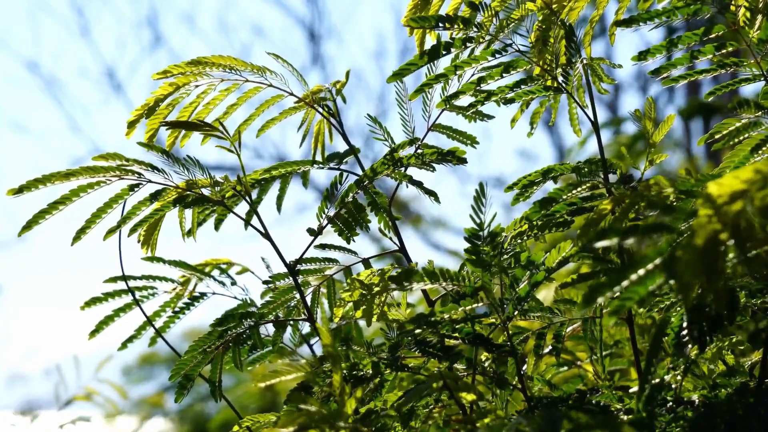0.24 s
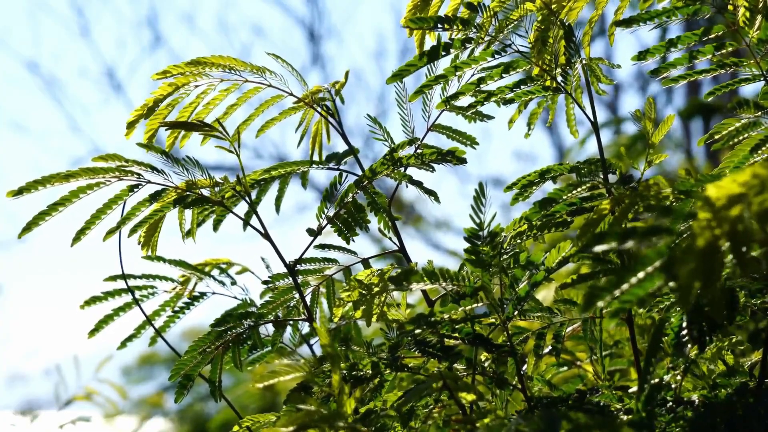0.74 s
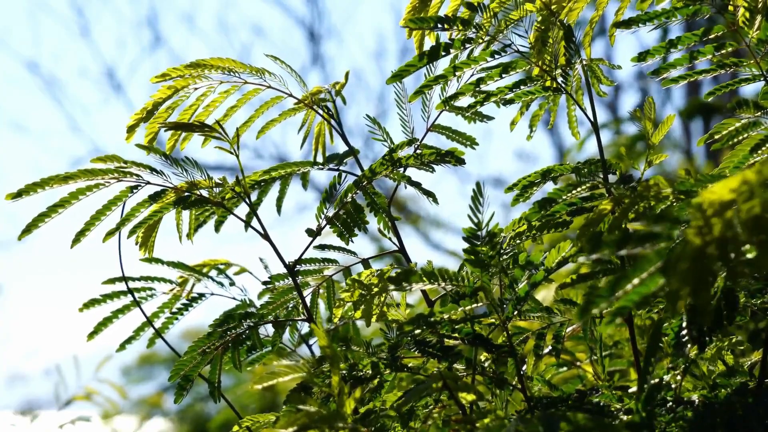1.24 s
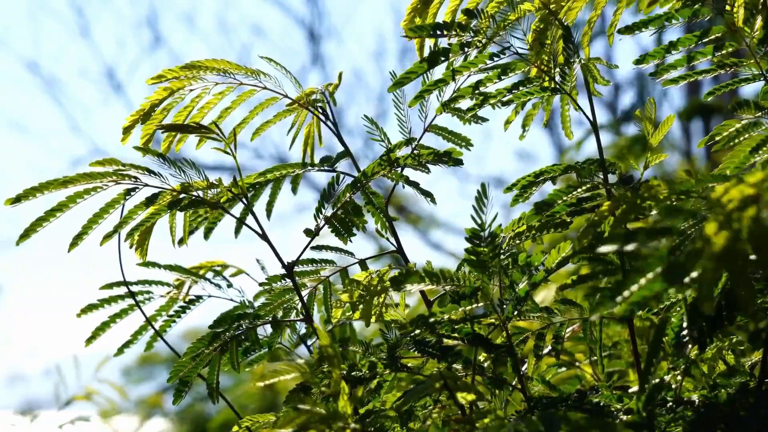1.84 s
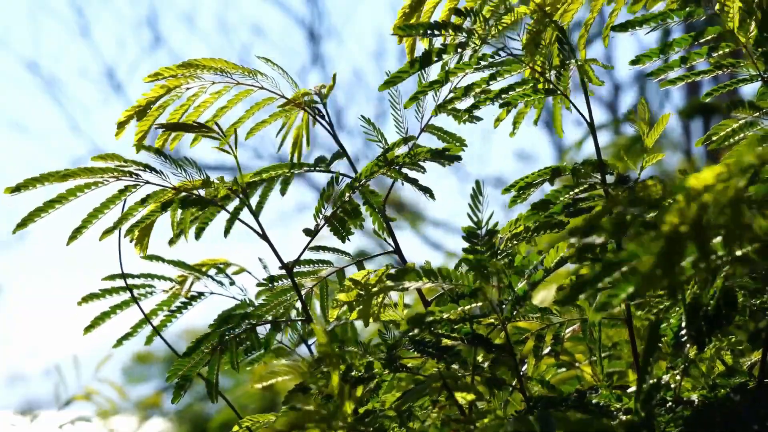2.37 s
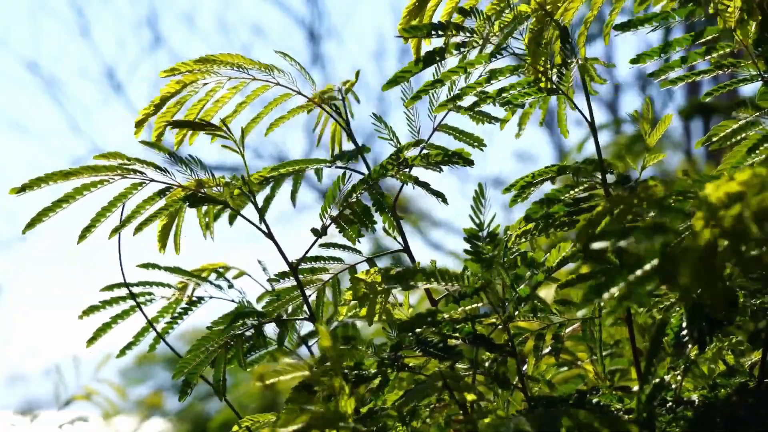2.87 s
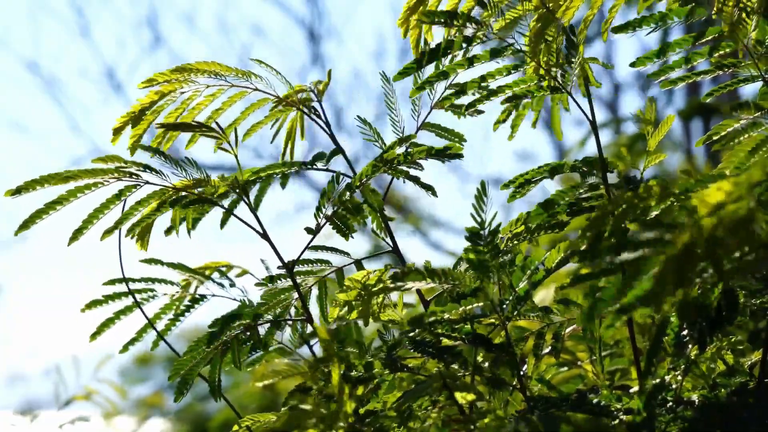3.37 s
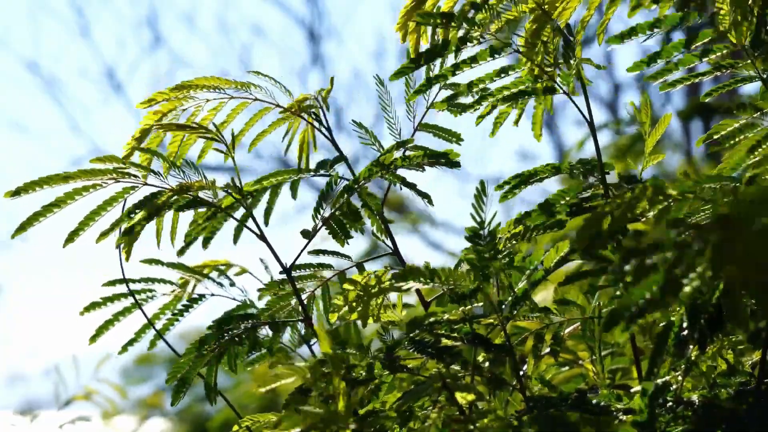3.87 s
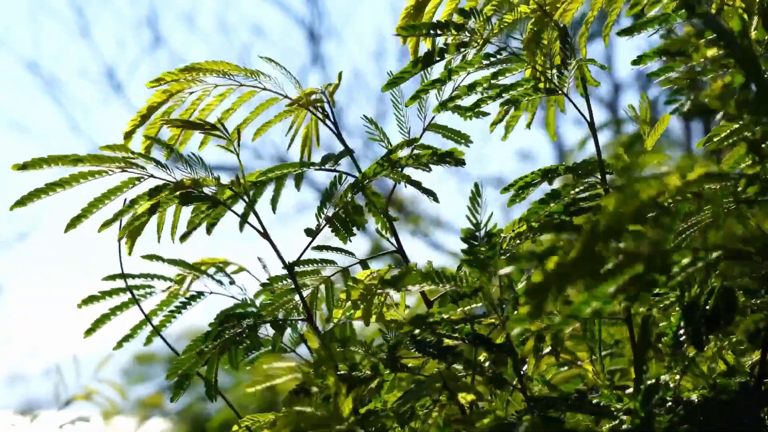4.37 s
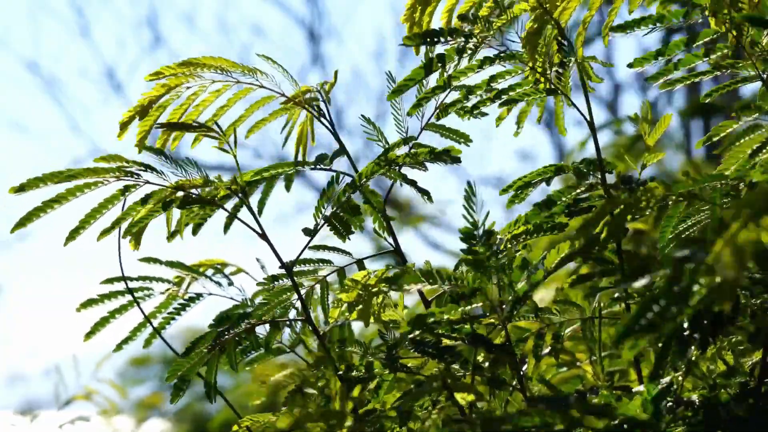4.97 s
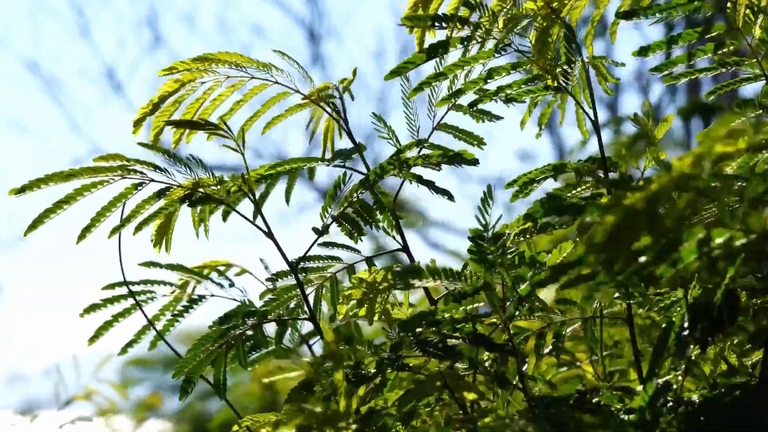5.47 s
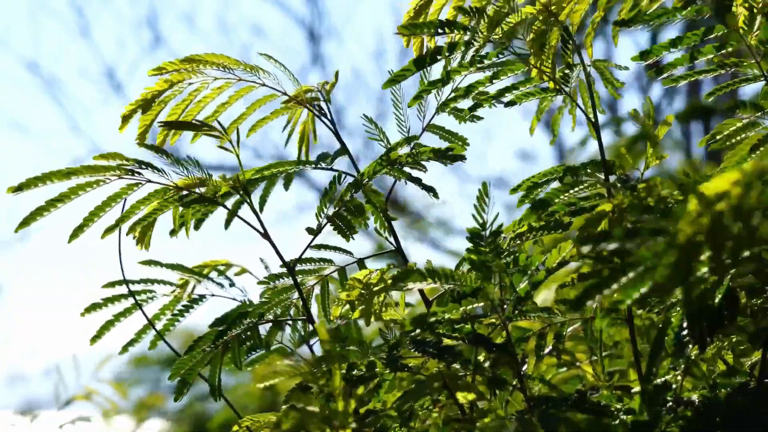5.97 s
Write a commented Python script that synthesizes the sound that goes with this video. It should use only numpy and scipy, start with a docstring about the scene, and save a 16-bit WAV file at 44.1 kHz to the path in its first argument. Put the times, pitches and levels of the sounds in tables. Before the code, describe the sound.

A brief, thin bird twitter opens over a light rustle of leaves and a faint hum that soon dies away. A high, pulsing insect rasp sets in and continues as the wind eases, then grows into a gust. Leaves sizzle, stems click close by, and low buffeting hits the microphone over the wash of far trees in the open air. Toward the end, a distant bird sounds short ringing notes.

```python
"""A feathery-leaved tree hisses and ticks in a building gust, as countless small impacts of its leaflets
add up to noise. Far trees wash behind it and eddies buffet the microphone. An insect rasps about six times
a second by driving a resonant membrane with clicks. A small bird twitters at first, a faint low drone
fades away, and a far bird gives bell-like notes, mostly near the end."""
import sys
import numpy as np
from scipy import signal
from scipy.io import wavfile
from scipy.ndimage import uniform_filter1d

SR = 44100
rng = np.random.default_rng(int(sys.argv[2]) if len(sys.argv) > 2 else 0)


def put_to_file(sound):
    """Save the sound as 16-bit audio at rate SR, in the file named by the first command-line argument."""
    columns = np.atleast_2d(sound).T  # one column per channel
    safe = np.clip(columns, -1, 1)
    whole_steps = np.round(safe * 32767)
    wavfile.write(sys.argv[1], SR, whole_steps.astype(np.int16))


N = 273861
TIME = np.arange(N) / SR


def from_db(db):
    """Amplitude ratio of a level in decibels."""
    return 10 ** (np.asarray(db) / 20)


def rms_one(x):
    """Normalisation to unit power."""
    return x / np.sqrt(np.mean(x ** 2) + 1e-20)


def in_time(rows):
    """Linear interpolation of each level column at every sample."""
    times, *columns = np.transpose(rows)
    return [np.interp(TIME, times, column) for column in columns]


def at_hz(points, hz):
    """Interpolation of a spectrum on a log-frequency axis."""
    frequencies, levels = np.transpose(points)
    return np.interp(np.log(hz), np.log(frequencies), levels)


def drift(rate_hz):
    """Slow random modulation: low-pass noise of unit power."""
    step, settle = 40, 2000
    r = np.exp(-2 * np.pi * step * rate_hz / SR)
    slow = signal.lfilter([1], [1, -2 * r, r * r], rng.standard_normal(N // step + settle + 2))[settle:]
    return np.interp(np.arange(N) / step, np.arange(len(slow)), rms_one(slow))


def band(x, low_hz, high_hz):
    """Butterworth band-pass filtering."""
    sections = signal.butter(2, [low_hz, min(high_hz, .45 * SR)], "band", fs=SR, output="sos")
    return signal.sosfilt(sections, x + 1e-18)


def resonate(x, hz, width_hz):
    """A damped resonator with unit gain at its peak."""
    r = np.exp(-np.pi * width_hz / SR)
    feedback = [1, -2 * r * np.cos(2 * np.pi * hz / SR), r * r]
    return signal.lfilter(np.array([1, 0, -1]) * (1 - r * r) / 2, feedback, x + 1e-18)


def spread(mid, side, side_db):
    """Mid-side stereo: a difference between the channels gives width."""
    return mid + from_db(side_db) * side * np.array([[1], [-1]])


def coloured(draws, spectrum, flutter_db, flutter_hz):
    """Spectral shaping in third octaves that flutter independently; neighbours take unrelated noise."""
    out, edges = 0, 31.25 * 2 ** (np.arange(28) / 3)
    for k, (low, high) in enumerate(zip(edges, edges[1:])):
        gain = from_db(at_hz(spectrum, np.sqrt(low * high)) + flutter_db * drift(flutter_hz))
        if high > spectrum[0][0]:
            out = out + gain * band(draws[k % 2], low, high)
    return rms_one(out)


def contacts(per_s, size_db, blur, channels):
    """Shot noise of leaf touches over a Gaussian blur of countless smaller ones; two unrelated draws."""
    shape = (2, channels, N)
    sizes = from_db(size_db * np.minimum(rng.exponential(1, shape), 4.5)) * rng.choice([-1, 1], shape)
    touches = sizes * (rng.random(shape) < per_s / SR)
    return rms_one(touches) + blur * rng.standard_normal(shape)


def crisp_ticks(per_s, width_hz=700):
    """Impulse excitation: each sparse dry touch briefly rings one resonance."""
    sizes = from_db(1.1 * np.minimum(rng.exponential(1, N), 3)) * (rng.random(N) < per_s / SR)
    pitches = np.geomspace(6500, 14200, num=24)
    dealt = rng.integers(len(pitches), size=N)
    return rms_one(sum(resonate(sizes * (dealt == k), hz, width_hz) * hz for k, hz in enumerate(pitches)))


def foliage():
    """Friction and impact: fronds sweep and leaflets patter, with more touches in a stronger gust."""
    # the gust in the near tree: (time [s], sweep level [dB], sizzle level [dB])
    gust = [(0, -52.5, -50), (.95, -60.5, -53), (1.85, -59.5, -56.5), (2.42, -57.5, -54.5),
            (2.6, -55.5, -52), (3.1, -54.5, -50), (3.3, -53, -47.5), (4.35, -54.5, -49.5),
            (4.7, -53, -48.5), (5.4, -52, -49), (6.15, -50, -48)]
    # spectrum of sweeping fronds: (frequency [Hz], relative density [dB])
    sweep_spectrum = [(1200, -5.5), (1900, 6), (3200, -3), (4400, 1), (6000, 5), (7800, 4), (9500, -7.5),
                      (14000, -49)]
    # spectrum of sizzling leaflets: (frequency [Hz], relative density [dB])
    sizzle_spectrum = [(5000, -17), (8000, -4), (9500, 7.5), (11300, 8.5), (13000, 9.5), (15000, -3)]
    sweep_db, sizzle_db = in_time(gust)
    per_s = 2400 * from_db(sizzle_db - sizzle_db.max())
    sway = drift(16.7)   # touches come in clumps as a branch swings
    rubs = contacts(per_s, size_db=4.5, blur=0.91, channels=2)
    sweep = coloured(rubs, sweep_spectrum, flutter_db=2.2, flutter_hz=41)
    taps = contacts(per_s, size_db=3.5, blur=1.0, channels=1)
    sizzle = coloured(taps, sizzle_spectrum, flutter_db=1.35, flutter_hz=65)
    sizzle = sizzle + from_db(-9) * crisp_ticks(per_s / 20)
    fronds = spread(*sweep, side_db=-8.5) * from_db(sweep_db - 0.1 + 1.8 * sway)
    return fronds + sizzle * from_db(sizzle_db - 0.9 + 1.24 * sway)


def far_trees(swell_db=4.5, peak_s=4.13, swell_s=4.06):
    """Incoherent summation: distant crowns merge into a wash that swells once over the steady open air."""
    # spectrum of wind in far crowns: (frequency [Hz], relative density [dB])
    wash_spectrum = [(70, 3), (130, 0.5), (250, 1), (500, -3), (1000, -6.5), (1500, -10), (2200, -14.5),
                     (3100, -38), (4500, -18), (7000, -17.5), (15000, -24.5)]
    # spectrum of the open air: (frequency [Hz], relative density [dB])
    air_spectrum = [(30, 2.5), (55, -3.5), (90, -10.5), (150, -15), (300, -17.5), (800, -19.5),
                    (2500, -33.5), (8000, -59)]
    wash_db = -51.5 + swell_db * np.exp(-((TIME - peak_s) / swell_s) ** 2)
    wash = coloured(rng.standard_normal((2, N)), wash_spectrum, flutter_db=1.0, flutter_hz=4.0)
    air = coloured(rng.standard_normal((2, N)), air_spectrum, flutter_db=1.5, flutter_hz=3.9)
    return from_db(wash_db) * wash + from_db(-48.5) * air


def buffeting(eddy_hz=9, width_hz=7, screen_hz=50):
    """Turbulent pressure: slow eddies push on the microphone; its windscreen smooths the faster ones."""
    # wind at the microphone: (time [s], relative level [dB])
    wind = [(.1, -34), (.45, -40.5), (1, -48), (2.1, -36.5), (2.35, -30.5), (3.1, -29), (3.55, -22),
            (3.9, -22), (4.55, -23), (4.9, -30.5), (5.3, -20.5), (5.75, -30), (6.05, -21.5)]
    level_db, = in_time(wind)
    r = np.exp(-np.pi * width_hz / SR)
    feedback = [1, -2 * r * np.cos(2 * np.pi * eddy_hz / SR), r * r]
    eddies = signal.lfilter([1], feedback, rng.standard_normal(N + SR))
    push = signal.sosfilt(signal.butter(1, [4, screen_hz], "band", fs=SR, output="sos"), eddies)[SR:]
    pressure = uniform_filter1d(from_db(level_db + 3.5), size=11025)   # the moving air has inertia
    return pressure * push / np.sqrt(uniform_filter1d(push ** 2, size=22050))


def drone(hz=213, width_hz=20, level_db=-54, hold_s=1.05, fade_s=0.97):
    """Narrow-band noise: a wavering hum, perhaps a far motor, holds and then fades."""
    fade = np.clip(1 - (TIME - hold_s) / fade_s, 0, 1)
    phase = 2 * np.pi * hz * TIME
    return from_db(level_db) * fade * (drift(width_hz) * np.sin(phase) + drift(width_hz) * np.cos(phase))


def small_bird(edge_s=0.0057):
    """Frequency modulation: each thin whistle is one straight, slightly unsteady glide."""
    # slurred notes: (onset [s], length [s], start pitch [Hz], end pitch [Hz], level [dB])
    notes = [(.022, .057, 6080, 4870, -52), (.08, .035, 4980, 5320, -50), (.147, 0.012, 6650, 6300, -49),
             (.171, .028, 6250, 5750, -59.5), (.21, 0.0204, 6650, 6050, -55.5),
             (.234, .015, 6900, 6340, -56), (0.26, .02, 7000, 6100, -56), (.361, .05, 6950, 5480, -55),
             (0.468, 0.072, 6280, 5040, -54.5)]
    whistles = np.zeros(N)
    waver = 1 + 0.0045 * drift(160)
    for onset, length, start_hz, end_hz, db in notes:
        hz = np.interp(TIME, [onset, onset + length], [start_hz, end_hz])
        gate = np.clip(.5 + np.minimum(TIME - onset, onset + length - TIME) / edge_s, 0, 1)
        whistles += gate * from_db(db) * np.sqrt(2) * np.sin(2 * np.pi * np.cumsum(hz * waver) / SR)
    return whistles + from_db(-7.0) * reverberation(whistles, t60=0.28)


def reverberation(x, t60):
    """Diffuse scattering off trunks and ground: decaying echo trains, different on each side."""
    echoes = np.zeros((2, N))
    for k, lag in enumerate((rng.uniform(0.0066, .05, size=16) * SR).astype(int)):
        loop, gain = x.copy(), from_db(-60 * lag / SR / t60)
        for i in range(lag, N, lag):
            loop[i:i + lag] += gain * loop[i - lag:i][:N - i]
        echoes[k % 2] += (loop - x) * (-1) ** (k // 2)
    return rms_one(echoes) * np.std(x)


def tick(time_s, peak_db, hz, breadth, decay_s, grit=0.53, brush=0.1, approach_s=.0012):
    """A contact transient: dry parts graze, crack broadly about one pitch, then brush as they part."""
    lead = SR // 100
    age = np.arange(-lead, SR // 20) / SR
    after = np.maximum(age, 0)
    graze = np.exp(np.minimum(age, 0) / approach_s)
    scrape = grit * np.exp(-after / decay_s) + brush * np.exp(-after / 0.0095)
    force = (age == 0) + rng.standard_normal(len(age)) * graze * scrape
    crack = band(force, hz / (1 + breadth), hz * (1 + breadth))
    return np.pad(from_db(peak_db) * crack / np.abs(crack).max(), (round(time_s * SR) - lead, N))[:N]


def near_twigs():
    """Discrete impacts: the closest leaflets and stems are loud enough to be heard one by one."""
    # leaflets flicking each other: (time [s], relative peak level [dB], pitch [Hz])
    flicks = [(0.5452, -35, 12400), (1.2067, -39, 11300), (1.3279, -37, 11500), (2.5636, -29.5, 10400),
              (3.2281, -36, 13800), (3.508, -37, 12100), (3.885, -32, 12100), (4.0347, -32, 12700),
              (4.6598, -38, 10700), (5.023, -31, 11600), (5.7329, -33, 11400), (5.852, -31, 11600),
              (5.9579, -31, 11900), (6.107, -29, 11900), (6.167, -30, 10700)]
    # stems knocking: (time [s], peak level [dB], pitch [Hz])
    knocks = [(.147, -32, 7400), (.472, -32, 7600), (3.454, -27.5, 9000), (3.883, -28.5, 7060),
              (4.737, -31, 3500), (4.931, -29.5, 4400), (5.087, -32.5, 3200), (5.195, -33, 3470),
              (5.736, -34, 4000), (5.985, -35, 1950)]
    leaflets = sum(tick(s, db + 1.5, hz, breadth=0.17, decay_s=0.00097) for s, db, hz in flicks)
    return leaflets + sum(tick(s, db, hz, breadth=0.88, decay_s=.001) for s, db, hz in knocks)


def chirping(first_s=.604, settled_period_s=.1661, warm_up_s=1.2, edge_s=0.031, floor_db=-15):
    """Amplitude modulation: the insect's chirps grow faster, shorter and louder as it warms up."""
    k = np.arange(N / SR / settled_period_s)
    centres = first_s + settled_period_s * k + .149 * (1 - np.exp(-k / 5))
    cold = np.exp(-np.maximum(TIME - first_s, 0) / warm_up_s)
    length_s = 0.1 + 0.025 * cold
    gate = 0
    for centre in centres:
        chirp = np.clip(.5 + (length_s / 2 - np.abs(TIME - centre)) / edge_s, 0, 1)
        gate = gate + from_db(0.3 * rng.standard_normal()) * chirp
    return from_db(-50 - 13 * cold) * (gate + from_db(floor_db))


def insect(click_hz=236, rasp=0.062):
    """Forced resonance: a fast train of clicks rings a membrane, and the foliage blurs the sound."""
    # modes of the membrane: (frequency [Hz], bandwidth [Hz], relative gain [dB])
    modes = [(4675, 120, -2.5), (4966, 200, 2.5), (5250, 200, -6.5), (5380, 57, -18)]
    turns = np.cumsum(click_hz * (1 + .022 * drift(40))) / SR
    clicks = np.diff(np.floor(turns), prepend=0) * from_db(0.57 * drift(120))
    # echoes off nearby stems fill the gaps between the clicks
    clicks = clicks + .5 * np.roll(clicks, round(.0028 * SR)) + .4 * np.roll(clicks, round(.0114 * SR))
    effort = chirping()
    roughness, scatter = rng.standard_normal((2, N))
    ring = sum(from_db(db) * resonate(clicks + rasp * roughness, hz, width) for hz, width, db in modes)
    return effort * spread(rms_one(band(ring, 4360, 6040)), rms_one(band(scatter, 4200, 5500)), side_db=-13)


def bell_bird(hold_s=0.013, rise_s=0.011):
    """Exponential decay: short pure notes linger among the trees and reach the two sides out of step."""
    # far notes: (onset [s], pitch [Hz], level [dB], 60 dB decay time [s], left-right phase [turns])
    notes = [(2.285, 8100, -48, 0.11, 0.23), (5.48, 2210, -54, 2.7, .1), (5.48, 5720, -49.5, .4, 0.3),
             (5.48, 5170, -50, .3, .4), (5.55, 4800, -52, .9, 0.3), (6.001, 5768, -42.5, 0.34, .2),
             (6.009, 4800, -48, 0.83, 0.32)]
    song = 0
    for onset, hz, db, t60, phase in notes:
        age = np.maximum(TIME - onset, 0)
        decay_db = 60 * np.maximum(age - hold_s, 0) / t60
        envelope = np.minimum(age / rise_s, 1) * from_db(db - decay_db + 2.7 * drift(25))
        song = song + envelope * np.sin(2 * np.pi * (hz * age + phase * np.array([[.5], [-.5]])))
    return song


def puffs():
    """Pressure pulses: small eddies thud softly, a little differently on each side."""
    # eddies reaching the microphone: (time [s], width [s], level [dB])
    eddies = [(3.79, 0.036, -48.5), (4.149, 0.015, -38.5), (4.23, 0.017, -57)]
    envelope = sum(from_db(db) * np.exp(-((TIME - s) / width) ** 2) for s, width, db in eddies)
    return envelope * spread(*rms_one(band(rng.standard_normal((2, N)), 110, 270)), side_db=-4)


def scene():
    """Superposition: the pressures of wind, drone, leaves and animals add."""
    air = buffeting() + puffs() + far_trees() + drone()
    return air + foliage() + near_twigs() + insect() + small_bird() + bell_bird()


def record(dry, cutoff_hz=15250, ease_s=.008):
    """Self-noise and band limiting: each channel adds hiss, the ends are eased and the top is cut."""
    # spectrum of the microphones' own hiss: (frequency [Hz], relative density [dB])
    hiss_spectrum = [(40, -15), (120, -23), (250, -12), (500, -10.5), (1000, -3), (2000, -1), (3300, 0),
                     (5000, -3), (7000, -3.5), (9000, -18.5), (10500, -34), (14000, -42)]
    hiss = coloured(rng.standard_normal((2, 2, N)), hiss_spectrum, flutter_db=1.23, flutter_hz=5.6)
    ease = np.clip(np.minimum(TIME, TIME[-1] - TIME) / ease_s, 0, 1)
    low_pass = signal.ellip(12, .2, 80, cutoff_hz, fs=SR, output="sos")
    return signal.sosfilt(low_pass, ease * (dry + from_db(-52.5) * hiss))


dry = scene()
out = record(dry)
put_to_file(out)
```